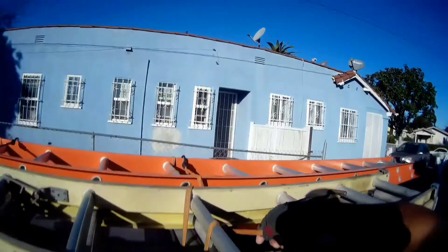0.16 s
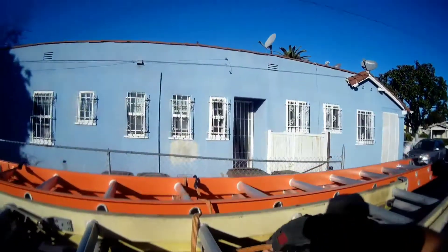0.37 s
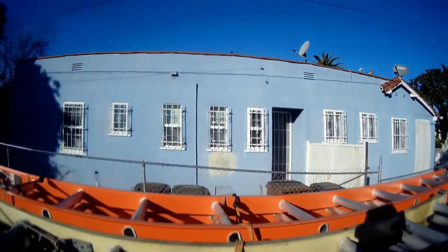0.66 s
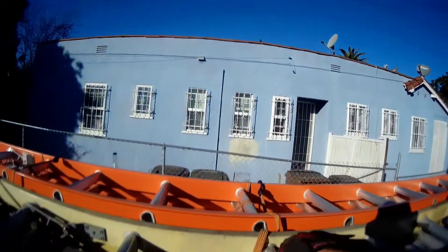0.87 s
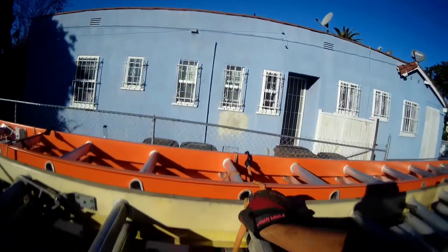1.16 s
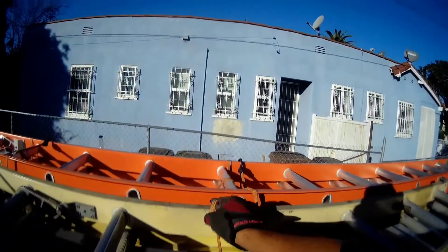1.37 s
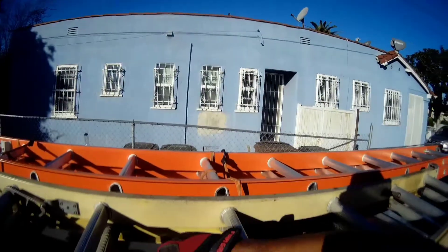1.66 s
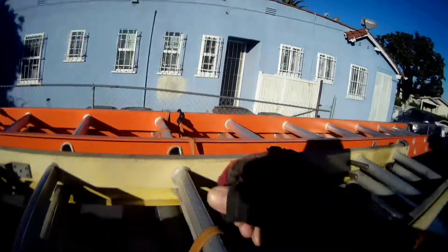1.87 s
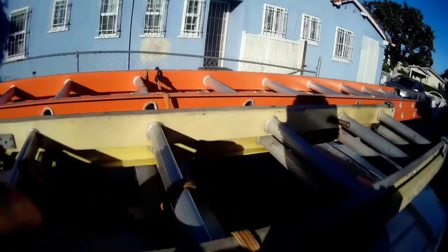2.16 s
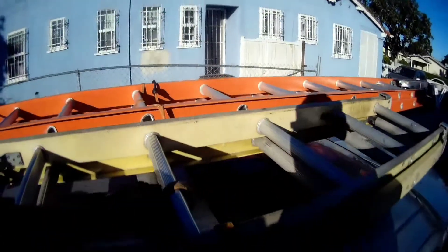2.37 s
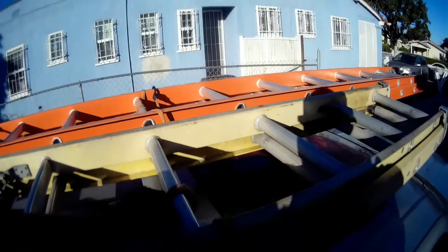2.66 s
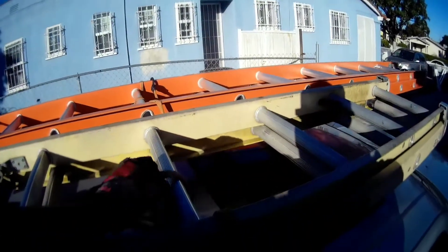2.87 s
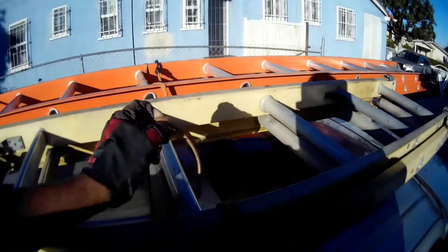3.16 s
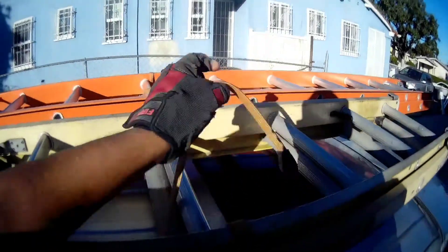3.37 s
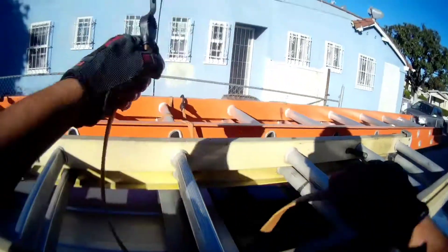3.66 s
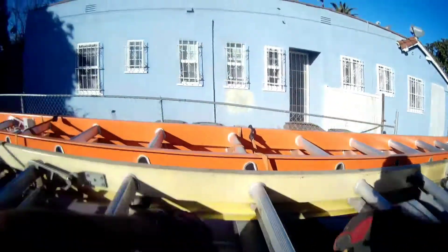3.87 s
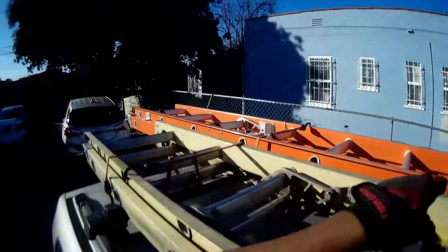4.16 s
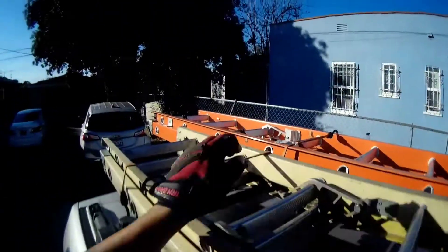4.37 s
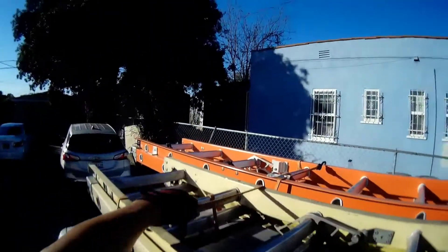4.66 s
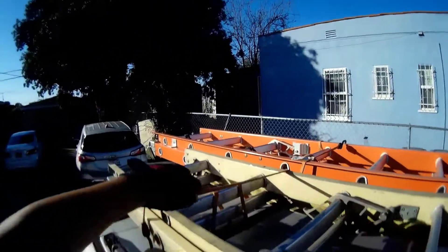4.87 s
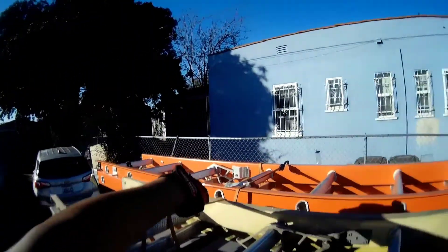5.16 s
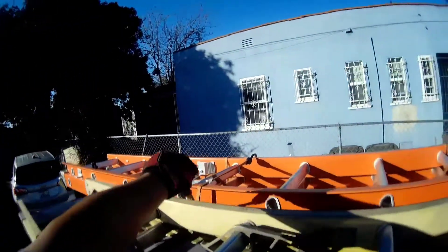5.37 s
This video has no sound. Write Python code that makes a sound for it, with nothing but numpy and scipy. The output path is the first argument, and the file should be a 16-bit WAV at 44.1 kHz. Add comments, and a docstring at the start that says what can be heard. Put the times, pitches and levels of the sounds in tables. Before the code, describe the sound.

Metal ladders clank, chatter and squeak on a truck rack outdoors as gloved hands rub and free a ringing strap hook.

```python
"""A faint rub of sleeve and glove comes first, in yard air; then metal clanks, chatters, scrapes and squeaks.
A gloved hand unhooks the straps of extension ladders on a truck rack: rails and rungs sound as modes and
filtered noise, a steel hook as decaying sines, a dragged rail as stick-slip noise, squeaks as gliding tones.
Scattered echoes return the metal from a house wall and the yard, a low hum swells at the end,
and the hardest blows overload the recorder."""
import sys
import numpy as np
from scipy import signal
from scipy.fft import rfft, irfft, next_fast_len
from scipy.io import wavfile

SR = 44100
rng = np.random.default_rng(int(sys.argv[2]) if len(sys.argv) > 2 else 0)


def bounce(signal):
    """Save signal as a 16-bit WAV file at the path given by the first command-line argument."""
    frames = np.transpose(np.atleast_2d(signal))
    limited = np.clip(frames, -1, 1)
    pcm = np.round(limited * 32767).astype(np.int16)
    wavfile.write(sys.argv[1], SR, pcm)


N = 243431
TIME = np.arange(N) / SR


def from_db(db):
    """Level to amplitude: 20 dB is a factor of ten."""
    return 10 ** (np.asarray(db) / 20)


def rms_one(x):
    """Normalisation to unit effective (rms) value."""
    return x / np.sqrt(np.mean(x ** 2) + 1e-20)


def passed(x, hz, kind, order=2):
    """Butterworth filtering: a maximally flat passband."""
    edges = np.clip(hz, 10, .45 * SR)
    return signal.sosfilt(signal.butter(order, edges, kind, fs=SR, output="sos"), x)


def dying(t, t60):
    """Exponential decay: the level falls 60 dB in t60 seconds."""
    return np.exp(-np.log(1000) * t / max(t60, 1e-3))


def drift(rate):
    """Random modulation: rate values per second, joined by straight lines, rms 1."""
    steps = rng.standard_normal(4096)
    return rms_one(np.interp(TIME * rate, np.arange(len(steps)), steps))


def coloured_noise(spectrum):
    """Spectral shaping: white noise is weighted in the frequency domain, then set to rms 1."""
    hz, db = np.transpose(spectrum)
    size = next_fast_len(N)
    f = np.fft.rfftfreq(size, 1 / SR) + 1e-3
    low_cut = np.minimum(1, f / hz[0]) ** 2
    gain = from_db(np.interp(np.log(f), np.log(hz), db)) * low_cut
    white = rng.standard_normal(size)
    return rms_one(irfft(rfft(white) * gain, size)[:N])


def add(out, s, sound):
    """Superposition: a sound is summed in from time s."""
    at = max(0, int(s * SR))
    out[at:at + len(sound)] += sound[:max(0, N - at)]


def movement(start_s, length_s, attack_db_per_s, release_db_per_s):
    """Exponential envelope: the level rises linearly in dB to 0, holds and falls again."""
    early = np.maximum(start_s - TIME, 0)
    late = np.maximum(TIME - start_s - length_s, 0)
    return from_db(-np.minimum(attack_db_per_s * early + release_db_per_s * late, 120))


# Spectrum of the outdoor air: (f/Hz, relative spectral level/dB)
AIR_SPECTRUM = [(22, -2), (115, 1.5), (250, -1), (600, -8), (1270, -18.5), (3000, -26), (8400, -34),
                (15000, -27)]


def yard_air(level_db=-51.5):
    """Broadband ambience: steady noise whose spectrum is weighted to the lows."""
    return from_db(level_db) * coloured_noise(AIR_SPECTRUM)


# Spectral lines of the low hum: (f/Hz, relative level/dB)
HUM_LINES = [(120, -56), (247, -46), (340, -51), (367, -48), (498, -58)]
# Swell common to all the lines: (t/s, gain level/dB)
HUM_SWELL = [(4.9, -30), (5.05, -9), (5.18, -3), (5.33, 1.5), (5.43, -2), (5.52, -4)]


def hum(flicker_db=3.0, pitch_waver=.009):
    """Line spectrum: low sines waver in level and frequency beneath a common swell."""
    lines = np.zeros(N)
    for hz, db in HUM_LINES:
        gain = from_db(db + flicker_db * drift(25))
        wavering_hz = hz * (1 + pitch_waver * drift(40))
        lines += gain * np.sin(2 * np.pi * np.cumsum(wavering_hz) / SR)
    swell = from_db(np.interp(TIME, *np.transpose(HUM_SWELL)))
    return np.sqrt(2) * lines * swell


# Hiss of the sleeve: (f/Hz, relative spectral level/dB)
SLEEVE_SPECTRUM = [(300, -0.5), (1000, -14.5), (2000, -16), (3500, 2), (4600, -6.5), (6000, 0.5),
                   (8000, -3), (10000, -8.5), (15000, -5)]
# Glove and strap rubbing on the rail: (f/Hz, relative spectral level/dB)
RUB_SPECTRUM = [(150, -17), (350, -2), (700, -6.5), (1100, -5), (1350, -5), (1700, 0.5), (1900, 0),
                (2200, -2.5), (2900, -10.5), (3600, -6), (4600, -18), (5600, -9.5), (9000, -29)]
# Strokes of the arm: (start t/s, length t/s, sleeve level/dB, rub level/dB)
STROKES = [(0, 0.038, -58, -51.5), (0.244, 0.087, -62, -55), (0.557, 0.28, -41.5, -39),
           (0.774, 0.056, -31.5, -32.5), (.85, .25, -38, -35), (1.154, 0.014, -50, -37.5),
           (1.27, 0.038, -52, -54), (1.373, 0.025, -61.5, -54), (1.48, .03, -55, -44.5),
           (1.66, 0.034, -40, -37.5), (1.906, 0.12, -41, -43.5), (2.44, 0.17, -52, -47),
           (2.7, 0.32, -62.5, -61.5), (2.98, 0.22, -57, -50), (3.232, .16, -41.5, -45),
           (3.44, 0.024, -46, -48), (3.573, 0.054, -43, -44), (3.703, 0.048, -59, -59.5),
           (3.904, 0.11, -57, -63.5), (4.356, .06, -53.5, -46), (4.665, .05, -57, -51.5),
           (4.814, .01, -56.5, -53.5), (4.926, 0.035, -47.5, -43), (5.051, 0.23, -54, -57.5),
           (5.22, .07, -53, -47), (5.31, 0.24, -35.5, -35.5)]
STROKE_ATTACK_DB_PER_S, STROKE_RELEASE_DB_PER_S = 359.5, 223
RESTING_SLEEVE_DB, RESTING_RUB_DB = -66, -73  # cloth and glove are never quite still


def handling(fibre_db=1.47, catch_db=1.5, pressure_db=1.4):
    """Friction noise: cloth hisses in fine grains; glove and strap rub the rail in coarser catches."""
    sleeve_gain, rub_gain = from_db(RESTING_SLEEVE_DB), from_db(RESTING_RUB_DB)
    for start_s, length_s, sleeve_db, rub_db in STROKES:
        stroke = movement(start_s, length_s, STROKE_ATTACK_DB_PER_S, STROKE_RELEASE_DB_PER_S)
        sleeve_gain = np.maximum(sleeve_gain, from_db(sleeve_db) * stroke)
        rub_gain = np.maximum(rub_gain, from_db(rub_db) * stroke)
    sleeve = coloured_noise(SLEEVE_SPECTRUM) * sleeve_gain * from_db(fibre_db * drift(500))
    rub = coloured_noise(RUB_SPECTRUM) * rub_gain * from_db(catch_db * drift(140))
    return (sleeve + rub) * from_db(pressure_db * drift(25))


# Delayed returns from the house and the yard: (delay t/s, level/dB before the treble loss)
ECHOES = [(.078, -28.5), (.122, -37.5)]


def echoes(x, dull_hz=5000, scatter_t60=0.11):
    """Diffuse reflection: convolution with delayed, decaying noise, then a loss of treble."""
    response, t = np.zeros(N), TIME[:SR // 3]
    for delay, db in ECHOES:
        scatter = rng.standard_normal(len(t)) * dying(t, scatter_t60)
        add(response, delay, from_db(db) * scatter / np.linalg.norm(scatter))
    returned = signal.fftconvolve(x, response[:SR // 2])[:N]
    return passed(returned, dull_hz, "low", order=1)


# Brief squeaks of the rails: (start t/s, length t/s, first f/Hz, last f/Hz, level/dB, roughness)
SQUEAKS = [(0.442, 0.046, 387, 532, -38.5, 1.3), (0.444, 0.054, 1107, 1215, -46, 0.94),
           (0.481, 0.048, 485, 406, -41.5, 1.3), (0.537, 0.062, 1236, 1358, -26, .7),
           (0.593, .033, 900, 825, -28.5, 0.5), (0.599, 0.014, 611, 627, -27, .4),
           (1.577, 0.038, 495, 470, -26.5, 0.4), (2.126, 0.06, 617, 620, -47, 0.13),
           (2.932, 0.32, 607, 619, -51, 0.37)]


def squeaks(wobble=0.021):
    """Mode locking: friction locks on to one mode, which glides and flutters."""
    out = np.zeros(N)
    for s, length, first_hz, last_hz, db, rough in SQUEAKS:
        along = np.linspace(0, 1, int(length * SR))
        flutter = rough * drift(300)[:len(along)]
        hz = (first_hz + (last_hz - first_hz) * along) * (1 + wobble * flutter)
        envelope = np.sqrt(2 * abs(np.sin(np.pi * along))) * (1 + flutter / 2)
        add(out, s, from_db(db) * envelope * np.sin(2 * np.pi * np.cumsum(hz) / SR))
    return out


# Resonances of the dragged rail: (f/Hz, bandwidth f/Hz, relative level/dB)
SCRAPE_MODES = [(614, 90, -12), (900, 130, -4), (1250, 220, 0), (1950, 400, -8), (2350, 200, -12),
                (3420, 280, -9), (5900, 250, -16)]
# A rail drags over the rack: (start t/s, length t/s, level/dB)
DRAGS = [(0.452, .04, -52), (.528, .078, -30), (4.346, 0.064, -41)]
DRAG_ATTACK_DB_PER_S, DRAG_RELEASE_DB_PER_S = 650, 260


def scrape(slips_per_s=78, unevenness=0.068):
    """Stick-slip: each slip of the rail is a puff of friction noise into its resonances."""
    cycle = np.cumsum(slips_per_s * (1 + unevenness * drift(60))) / SR % 1
    friction = rng.standard_normal(N) * np.exp(-2 * cycle)
    body = np.zeros(N)
    for k, (hz, width, db) in enumerate(SCRAPE_MODES):
        resonance = passed(friction, [hz - width / 2, hz + width / 2], "band", order=1)
        body += from_db(db) * resonance * (-1) ** k  # neighbours in opposite phase
    drags = [from_db(db) * movement(s, length, DRAG_ATTACK_DB_PER_S, DRAG_RELEASE_DB_PER_S)
             for s, length, db in DRAGS]
    return rms_one(body) * np.max(drags, axis=0)


# Low resonances of the rack: (f/Hz, bandwidth f/Hz, relative level/dB)
RACK_MODES = [(107, 60, -6), (160, 35, -2), (256, 55, 2)]
# The heaviest blows also shake the rack, which thuds: (t/s, level/dB over the first 30 ms)
THUDS = [(0.893, -33), (0.9652, -37), (1.087, -42), (1.929, -22), (3.179, -36.5), (4.275, -32),
         (4.314, -29)]


def rack(t60=0.17, tail_t60=0.22, tail_db=-17.0):
    """Forced resonance: a decaying noise burst excites the low modes in a short, dull thud."""
    out, t = np.zeros(N), TIME[:SR // 2]
    attack = t < .03
    for s, db in THUDS:
        fade = dying(t, t60) + from_db(tail_db) * dying(t, tail_t60)
        shake = rng.standard_normal(len(t)) * fade
        thud = np.zeros(len(t))
        for hz, width, mode_db in RACK_MODES:
            resonance = passed(shake, [hz - width / 2, hz + width / 2], "band", order=1)
            thud += from_db(mode_db) * resonance
        thud = passed(thud, 400, "low")
        add(out, s, thud / np.std(thud[attack]) * from_db(db))
    return out


# Modes of the swinging strap hook: (f/Hz, level/dB, decay t60/s)
HOOK_MODES = [(484, -26, .5), (608, -29, .2), (668, -16, .17), (1739, -38, .3), (3625, -21, .08),
              (3690, -26, .08), (3775, -23, .19)]
HOOK_S = 3.322  # the strap hook is knocked free (s)


def hook(rise_s=0.00064, sway_db=1.5):
    """Free vibration: the modes of the steel hook ring on, wavering in level as it swings."""
    out, t = np.zeros(N), TIME[:SR]
    build_up = 1 - np.exp(-(t / rise_s) ** 2)
    for hz, db, t60 in HOOK_MODES:
        gain = from_db(db + sway_db * drift(91)[:SR])
        add(out, HOOK_S, gain * np.sin(2 * np.pi * hz * t) * build_up * dying(t, t60))
    return out


def along_rung(x):
    """Comb filtering: waves run back and forth along a rung and leave a row of broad peaks."""
    lag = int(rng.uniform(.0009, .0022) * SR)
    return x + .5 * np.roll(x, lag, axis=-1) + .25 * np.roll(x, 2 * lag, axis=-1)


# How each register of a blow sounds and dies, from body through knock, clank, edge and tick to sparkle:
# (level/dB, gain per weight dB/dB, gain per hardness dB/dB, crack t60/s, tail t60/s, tail level/dB)
REGISTERS = [(-5.5, 1, 0, .22, .39, -14), (-6, .72, -0.46, .11, .5, -16), (-0.5, 0, 0, .09, .45, -23),
             (-3.5, 0, 1, 0.073, 0.093, -23.5), (-11, 0, 1, .041, .3, -21.5),
             (-35.5, -0.5, 2.5, 0.034, .15, -28.5)]
# Borders of the registers: (f/Hz)
REGISTER_EDGES = [270, 750, 1400, 2700, 4900, 8400, 15500]
# Modes of rails and rungs: (f/Hz before detuning, relative level/dB, decay t60/s)
LADDER_MODES = [(296, -4, .25), (330, -9, .22), (378, -4, .25), (440, -8, .22), (500, -8, .22),
                (757, -7, .15), (1005, -5, .13), (1108, -3, .15), (1320, -8, .1), (1500, -1, .13),
                (1665, 2, .13), (1810, -6, .11), (1993, -1, .11), (2305, -4, .11), (2531, -4, .1),
                (2815, -5, .08), (2965, -3, .07), (3143, -5, .06), (3445, -2, .06), (3636, -3, .06),
                (3760, -3, .06), (4005, -1, .05), (4400, -5, .03), (5360, -2, .03), (6150, -3, .03),
                (6940, -3, .03)]
# Blows on the ladder; weight fills the low registers, a hard contact the high ones:
# (t/s, level/dB, weight level/dB, hardness level/dB, chatter t/s, main ring of the struck part f/Hz)
BLOWS = [(0.127, -52.5, 11.5, 2.5, .008, 417), (.191, -23.5, -2.5, -1.5, .0015, 2160),
         (.262, -42.5, 10, 3, .017, 322.4), (.894, -16.5, -1, 6.5, .0016, 2946),
         (.906, -9.5, -14, -2, .014, 1688), (0.9649, -7, -11, 2, .011, 1983),
         (1.044, -14, -13.5, -8, .004, 1900), (1.06, -34.5, 4, 5, .005, 1780),
         (1.087, -12, -8, -5.5, 0.0042, 1700), (1.157, -24, -3, -2, .004, 1733),
         (1.316, -45.5, 8, -7.5, .003, 1005), (1.478, -34, 4.5, -10, .022, 1290),
         (1.502, -10, -15, -16, .012, 1612), (1.517, -10.5, -6, -6, .012, 1523),
         (1.929, -24, 13.5, 9.5, .0035, 310), (1.96, -21.5, 3.5, 12.5, .004, 3902),
         (2.446, -27.5, -0.5, -10.5, .008, 1279), (2.49, -33, 8.5, -7.5, .006, 491),
         (2.617, -36.5, -1.5, 2, .005, 2160), (2.796, -30, -7.5, -3, .0016, 2120),
         (2.845, -45, 0, -10.5, .004, 1680), (2.945, -44, 2, -6, .008, 1633),
         (3.179, -40, 15, 5, .001, 379), (3.21, -30, -1, 4.5, .0014, 3620),
         (3.2563, -12.5, -13.5, -1, .004, 1764), (3.278, -19, -1.5, -12.5, .008, 1054),
         (3.3214, -24, -3, 3.5, .003, 3590), (3.518, -19.5, -2, 1, .001, 1093),
         (4.271, -27, 3, 5.5, 0.005, 3120), (4.282, -44, 22, 11.5, .006, 340),
         (4.3153, -23, 7, -2, .004, 1232), (4.352, -43, 8, -0.5, .046, 440),
         (4.42, -47.5, 5, -5.5, .006, 1645), (4.595, -47.5, 4, -6.5, .008, 2006),
         (4.838, -30.5, -2.5, 1, .004, 2130), (4.88, -39, 4, 3, .007, 1630)]


def ladder(modes_db=-14.0, main_db=-6.5, main_t60_at_1500_hz=0.12, grain_db=1.5, detune=0.0072,
           rise_s=0.00037, snap_db=2.0, snap_t60=0.013):
    """Modal superposition: noise for a crack of dense modes, sines for the long modes, and a faint tail."""
    out, t = np.zeros(N), TIME[:SR * 3 // 5]
    attack = t < .03
    rise = 1 - np.exp(-t / rise_s)
    snap = from_db(snap_db) * dying(t, snap_t60)
    mode_hz, mode_db, mode_t60 = np.transpose(LADDER_MODES)
    count = len(mode_hz)
    decays = np.array([dying(t, t60) for t60 in mode_t60], np.float32)
    for s, blow_db, weight_db, hardness_db, chatter_s, main_hz in BLOWS:
        # no two rungs are quite alike, and the point of contact decides how strongly each mode speaks
        pitches = mode_hz * (1 + detune * rng.standard_normal(count))
        strengths = from_db(mode_db + modes_db + rng.normal(0, 3.5, count)) * rng.choice([-1, 1], count)
        phases = np.outer(2 * np.pi * pitches, t).astype(np.float32)
        ring = strengths @ (np.sin(phases) * decays)
        main_t60 = main_t60_at_1500_hz * np.sqrt(1500 / main_hz)  # small, high parts die sooner
        ring += from_db(main_db) * np.sin(2 * np.pi * main_hz * t) * dying(t, main_t60)

        # loose sections chatter: the crack holds its strength this long before it decays
        free = np.maximum(t - max(chatter_s, 0), 0)
        grain_steps = rng.standard_normal(400)
        grain = from_db(grain_db * np.interp(t * 500, np.arange(400), grain_steps))
        dense = along_rung(rng.standard_normal((2, len(t)))) * grain

        for k, register in enumerate(REGISTERS):
            register_db, per_weight, per_hardness, crack_t60, tail_t60, tail_db = register
            fade = snap + dying(free, crack_t60) + from_db(tail_db) * dying(t, tail_t60)
            struck = (dense[k % 2] * fade + ring) * rise
            part = passed(struck, REGISTER_EDGES[k:k + 2], "band", order=3)
            colour_db = register_db + per_weight * weight_db + per_hardness * hardness_db
            # the level refers to the first 30 ms
            add(out, s, part / np.std(part[attack]) * from_db(blow_db + colour_db))
    return out


def scene():
    """Linear superposition of metal, its echoes, handling, hum and outdoor air."""
    metal = ladder() + rack() + hook() + scrape() + squeaks()
    return (metal + echoes(metal) + handling() + hum() + yard_air())[None]


def record(dry, ceiling=0.94, main_top_hz=10050, shelf_hz=11900, shelf_db=-11.5, cutoff_hz=16400):
    """Saturation and band limiting: peaks flatten, treble falls steeply to a shelf, the top is cut."""
    clipped = dry / (1 + (dry / ceiling) ** 6) ** (1 / 6)
    main = signal.sosfilt(signal.ellip(10, .2, 70, main_top_hz, fs=SR, output="sos"), clipped)
    shelf = from_db(shelf_db) * passed(clipped, shelf_hz, "high", order=12)
    top_cut = signal.cheby2(18, 80, cutoff_hz, fs=SR, output="sos")
    return signal.sosfilt(top_cut, main + shelf)


dry = scene()
out = record(dry)
bounce(out)
```